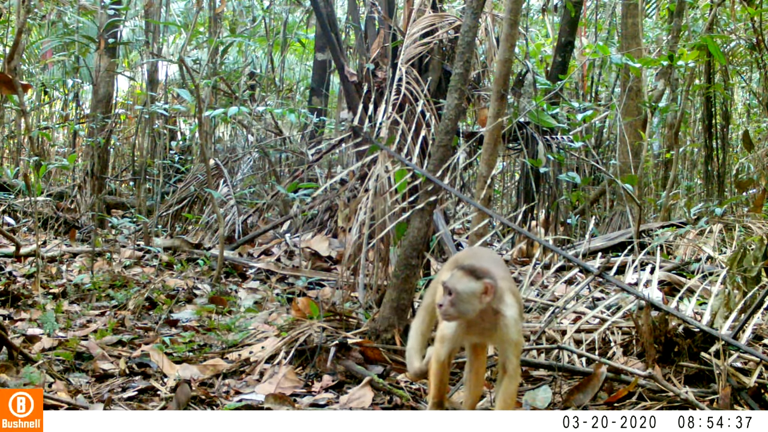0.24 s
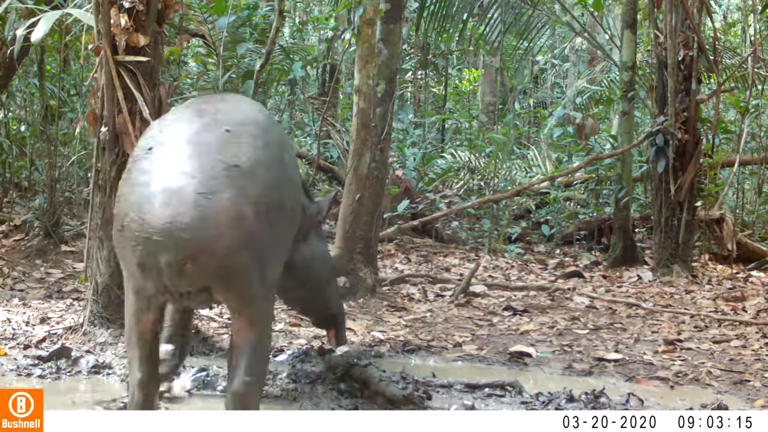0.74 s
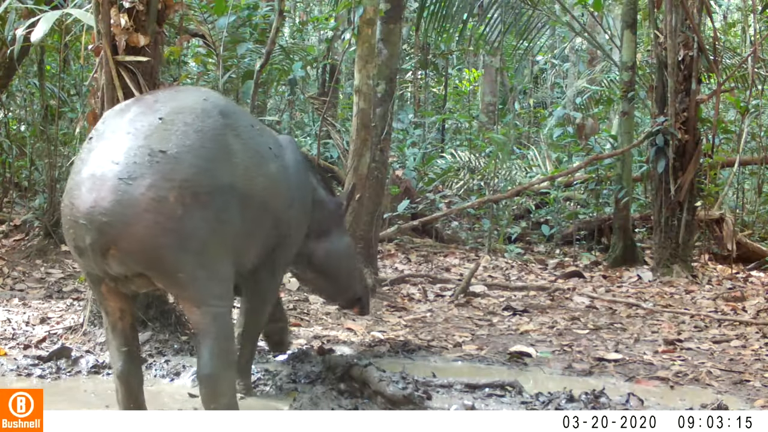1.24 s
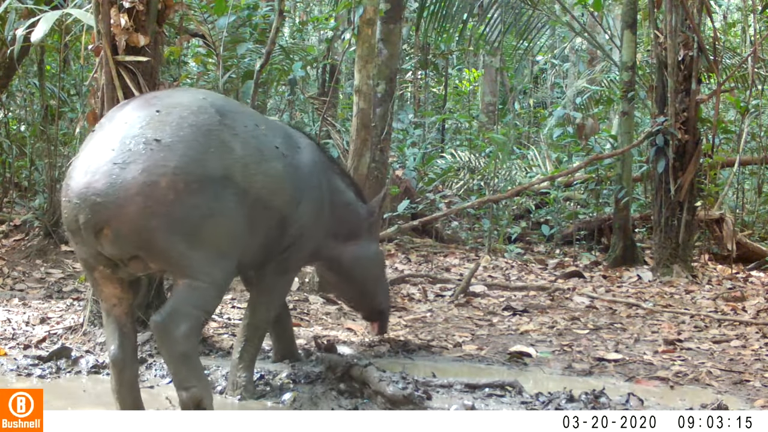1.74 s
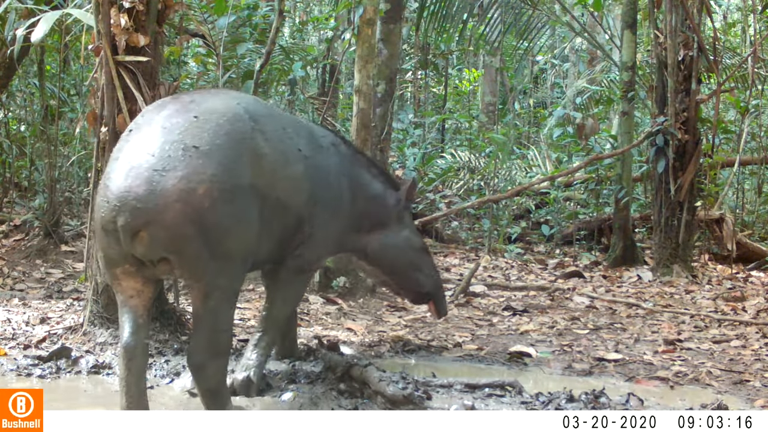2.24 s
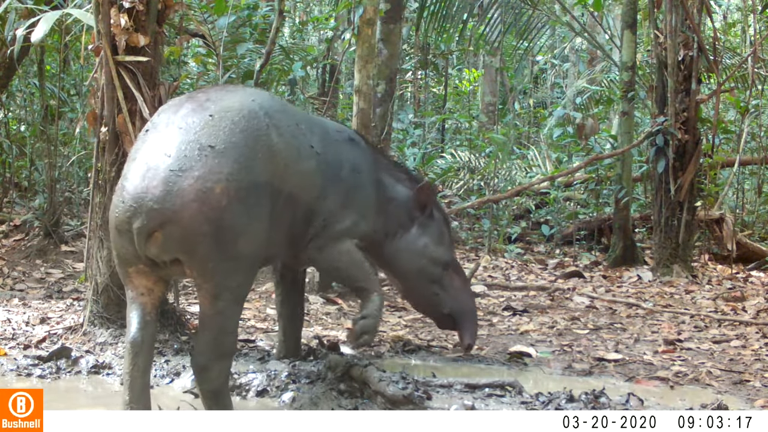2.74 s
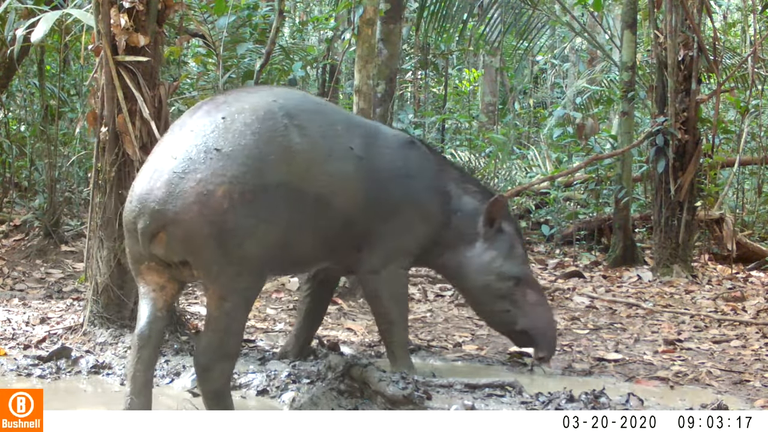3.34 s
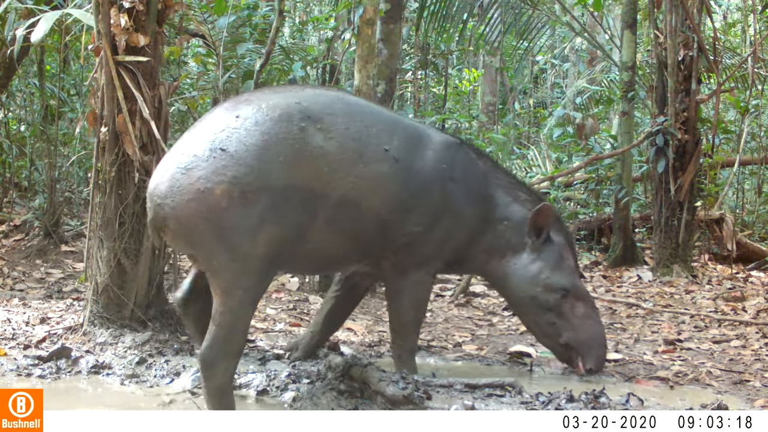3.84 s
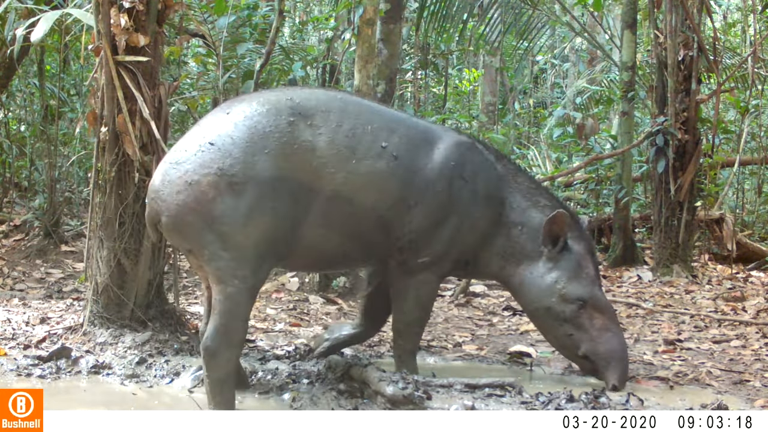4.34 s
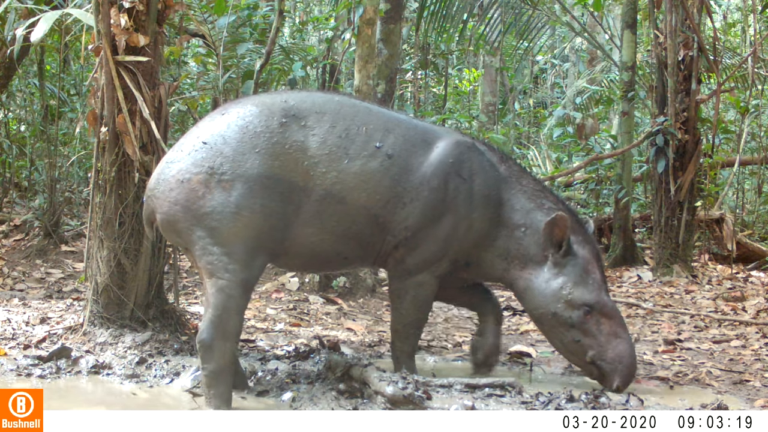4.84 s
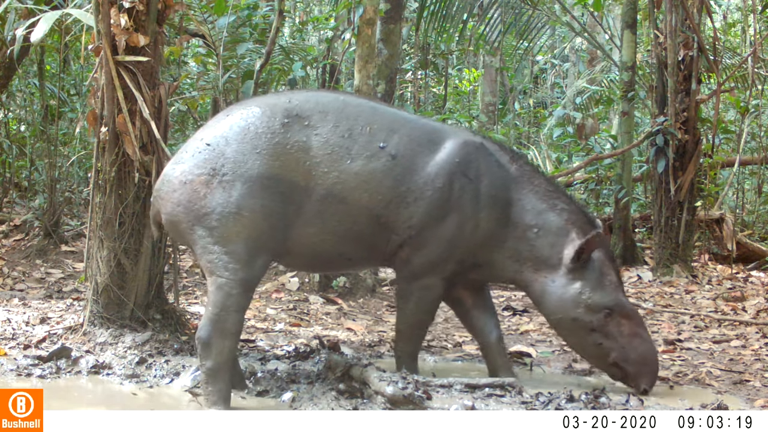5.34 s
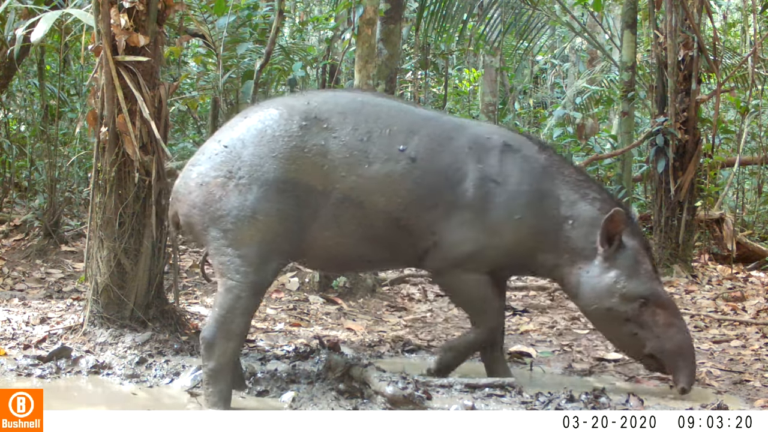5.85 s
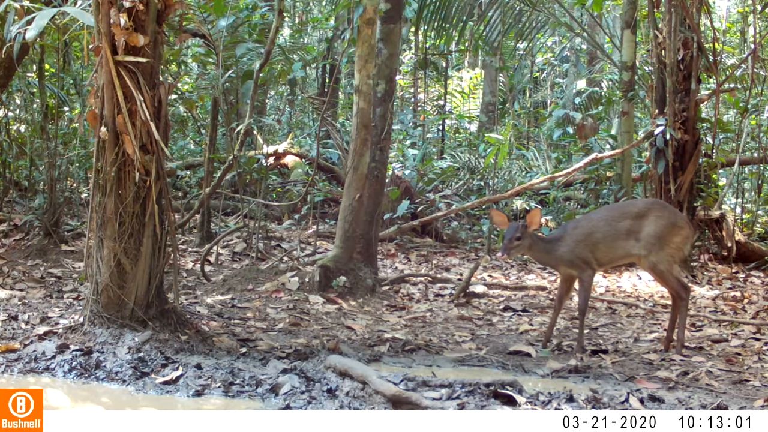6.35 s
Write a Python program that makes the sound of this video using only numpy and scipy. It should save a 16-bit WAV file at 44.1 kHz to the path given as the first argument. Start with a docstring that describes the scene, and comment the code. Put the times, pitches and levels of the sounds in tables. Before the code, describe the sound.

Muffled plops, wet smacks and small bubbles of a tapir wading through mud thin out over constant hiss and faint camera ticks.

```python
"""A tapir wades slowly through a shallow mud wallow in a forest, a few metres from a trail camera.
First comes a hiss with faint hum and static; all drops out for an instant, and hiss and hum return.
Then drops and bubbles ring, wet mud smacks and stirred slurry crackles, dulled by the camera's case.
Soon air pockets gulp as they fill and plop open under its feet, loudest around two seconds in.
From there the camera ticks faintly, in runs, while the steps thin out."""
import sys
import numpy as np
from scipy import signal
from scipy.fft import rfft, irfft
from scipy.io import wavfile
from scipy.ndimage import uniform_filter1d

SR = 44100
rng = np.random.default_rng(int(sys.argv[2]) if len(sys.argv) > 2 else 0)


def output_pcm(signal):
    """Save a mono or channel-first signal as 16-bit PCM at the path in sys.argv[1].

    Samples are clipped to [-1, 1] before scaling.
    """
    pcm = np.clip(np.atleast_2d(signal).T, -1, 1) * 32767
    wavfile.write(sys.argv[1], SR, np.round(pcm).astype(np.int16))


N = 290852
T = np.arange(N) / SR
DROPOUT_START_S, DROPOUT_END_S = .749, .798


def undb(db):
    """Decibels to gain."""
    return 10 ** (np.asarray(db) / 20)


def unit(x):
    """Scale to rms 1."""
    return x / np.sqrt(np.mean(x ** 2) + 1e-20)


def add(out, s, sound):
    """Mix a sound in at time s."""
    i = int(s * SR)
    out[i:i + len(sound)] += sound[:N - i]


def fade(t, t60):
    """Exponential decay, 60 dB down after t60."""
    return np.exp(-np.log(1000) * t / t60)


def colour(x, points):
    """EQ along a curve of (frequency [Hz], gain [dB]) points."""
    hz, db = np.transpose(points)
    f = np.maximum(np.fft.rfftfreq(len(x), 1 / SR), 1)
    return irfft(rfft(x) * undb(np.interp(np.log(f), np.log(hz), db)), len(x))


def band(x, hz, spread, order=2):
    """Broad resonance from hz / spread to hz * spread."""
    sos = signal.butter(order, [hz / spread, hz * spread], "band", fs=SR, output="sos")
    return signal.sosfilt(sos, x)


def wander(rate_hz):
    """Smooth random modulation with rms 1."""
    hold = int(SR / rate_hz)
    steps = np.repeat(rng.standard_normal(N // hold + 1), hold)
    return unit(uniform_filter1d(uniform_filter1d(steps, hold), hold)[:N])


def housing(x, low_hz=350, high_hz=4400):
    """The sealed camera case passes only the mids."""
    x = signal.sosfilt(signal.butter(1, low_hz, "high", fs=SR, output="sos"), x)
    return signal.sosfilt(signal.butter(4, high_hz, fs=SR, output="sos"), x)


# Tones of the electric hum: (frequency [Hz], relative level [dB])
HUM_TONES = [(59, -90), (125, -88)]
def hum():
    """A faint electric hum of two low sines."""
    return sum(np.sqrt(2) * undb(db) * np.sin(2 * np.pi * hz * T) for hz, db in HUM_TONES)


# EQ curve of the hiss: (frequency [Hz], relative level [dB])
HISS_EQ = [(18, -53), (30, -20.5), (55, -19.5), (88, -13.5), (123, -14), (256, -8), (299, -7.5),
           (443, -4.5), (728, -2.5), (808, -2.5), (1110, -1.5), (2550, -4.5), (3490, -12), (7080, -38),
           (15500, -40)]
# The bed before and after the dropout: (trim [dB], flicker depth [dB])
BED_STATES = [(-2.5, 1.66), (0.5, 1.0)]
def hiss_bed(level_db=-53.5, drift_db=.3, dip_db=-3.5, recover_s=.15):
    """Grainy, flickering hiss over the hum; both come back low after the dropout and swell up."""
    after = T > DROPOUT_END_S
    trim_db, flicker_db = (np.where(after, late, early) for early, late in zip(*BED_STATES))
    dip = after * np.clip(1 - ((T - DROPOUT_END_S) / recover_s) ** 2, 0, 1)
    flicker = undb(flicker_db * wander(rate_hz=500))
    flicker /= np.sqrt(uniform_filter1d(flicker ** 2, SR // 4))  # same mean power at any depth
    noise = unit(colour(rng.standard_normal(N) * flicker, HISS_EQ))
    hiss = noise * undb(level_db + drift_db * wander(rate_hz=8.5))
    return (hiss + hum()) * undb(trim_db + dip_db * dip)


def static(per_second=300, peak_db=-47, upward_share=.25):
    """Fine crackle up to the dropout: tiny electrical spikes of one size, most of one polarity."""
    chance, sign = rng.random((2, N))
    fires = (chance < per_second / SR) & (T < DROPOUT_START_S)
    spikes = fires * np.where(sign < upward_share, 1, -1)
    click = housing(signal.unit_impulse(SR // 100), low_hz=200, high_hz=2500)
    return undb(peak_db) * signal.fftconvolve(spikes, click / click.max())[:N]


def bubble(hz, t60, rise_octaves, swell_cycles=1.0):
    """A pocket of air swells within a cycle or two and rings out, bending up as it nears the surface."""
    t = np.arange(int(t60 * SR)) / SR
    envelope = (1 - np.exp(-(t * hz / swell_cycles) ** 2)) * fade(t, t60)
    glide_hz = hz * 2 ** (rise_octaves * t / t60)
    return envelope / envelope.max() * np.sin(2 * np.pi * np.cumsum(glide_hz) / SR)


def drips(level_db=-55.5, centre_hz=4300, busy_per_second=45, sparse_per_second=3):
    """Droplets and pinhead bubbles prickle as the animal shifts its weight, then thin as it walks on."""
    out = np.zeros(N)
    for start_s, end_s, rate in (.79, 3.3, busy_per_second), (3.3, 6.2, sparse_per_second):
        count = int(rate * (end_s - start_s))
        times = rng.uniform(start_s, end_s, count)
        for s, (softer_db, pitch) in zip(times, rng.standard_normal((count, 2))):
            ping = bubble(centre_hz * 2 ** (.2 * pitch), t60=.008, rise_octaves=.1)
            add(out, s, undb(level_db - softer_db) * ping)
    return out


# Foreground bubbles and drops: (time [s], pitch [Hz], relative level [dB], decay t60 [s])
BUBBLE_HITS = [ (0.837, 1520, -35, 0.026), (.852, 1260, -39, .025), (0.889, 3900, -42, .015),
               (.891, 2840, -33, .029), (.898, 3800, -45, .015), (.902, 625, -39, 0.068),
               (.908, 2980, -37, .018), (.925, 3000, -37, 0.028), (.946, 1120, -34, .014),
               (1.037, 3250, -43, .018), (1.058, 1380, -39, .018), (1.082, 3750, -46, 0.028),
               (1.112, 3180, -39.5, .022), (1.226, 2760, -37, 0.016), (1.281, 3120, -38.5, 0.019),
               (1.302, 4100, -45, .022), (1.457, 3100, -43, .018), (1.510, 1010, -38.5, 0.018),
               (1.667, 1030, -38, .023), (1.711, 3080, -40, .024), (1.759, 2600, -38.5, 0.026),
               (1.774, 1450, -39, 0.025), (1.8152, 4630, -38, .012), (1.838, 1340, -33, .02),
               (1.851, 2700, -35.5, 0.016), (1.860, 3340, -34.5, 0.017), (1.868, 1305, -31, 0.025),
               (1.8955, 4000, -43, 0.013), (1.939, 3170, -38.5, .02), (1.953, 3850, -47, 0.015),
               (2.004, 1314, -20, 0.01), (2.0042, 3200, -24, 0.012), (2.013, 2520, -35, .022),
               (2.021, 1820, -39, 0.026), (2.028, 1710, -32.5, .015), (2.0323, 3000, -30.5, 0.021),
               (2.0382, 3280, -35.5, 0.014), (2.131, 1400, -38, .028), (2.1733, 4120, -30, 0.016),
               (2.243, 2280, -39, .015), (2.2535, 1580, -33.5, .022), (2.398, 957, -27, 0.012),
               (2.7884, 1410, -35, .022), (3.028, 2970, -38, 0.031), (3.038, 1530, -35, .022),
               (3.0935, 1800, -37, .012), (3.116, 1650, -37, .014), (3.1535, 1600, -39, .016),
               (3.168, 1150, -41, .014), (3.777, 3420, -41.5, 0.014), (4.027, 2050, -39, .018),
               (4.0378, 1300, -40, .02), (4.044, 1750, -40, .018), (4.0835, 2180, -25, 0.011),
               (4.087, 1000, -40, .016), (4.092, 1750, -34, .02), (4.1055, 4700, -48, .012),
               (4.2837, 1610, -33.5, 0.023), (5.120, 3270, -39, .014), (5.133, 1450, -46, .016),
               (5.138, 2000, -40, .028), (5.146, 2930, -39, .016), (5.2155, 1130, -40.5, .018),
               (5.835, 2330, -38.5, .025), (5.853, 1720, -42, .02), (6.023, 1830, -35, .02),
               (6.223, 1040, -31.5, 0.017)]
def bubbles(gain_db=-4, hollow_db=-12, detune_octaves=.16, linger_s=.038, climb_octaves_per_s=6.6):
    """Single bubbles and drops; the mud hollow beside each rings a little off pitch, so the tail beats."""
    out = np.zeros(N)
    for s, hz, db, t60 in BUBBLE_HITS:
        offset, side = rng.random(2)
        rise = climb_octaves_per_s * max(t60 - linger_s, 0)  # only a lingering bubble surfaces
        hollow_hz = hz * 2 ** (detune_octaves * (1 + offset) * np.sign(side - .5))
        hollow = undb(hollow_db) * bubble(hollow_hz, t60, rise)
        add(out, s, undb(db + gain_db) * (bubble(hz, t60, rise) + hollow))
    return out


# Mud parting or slapping shut:
# (time [s], centre [Hz], spread to each side [ratio], relative level [dB], decay t60 [s])
SMACK_HITS = [ (0.8382, 2350, 1.15, -41.5, .012), (.908, 3670, 1.25, -39, .014),
              (.925, 2600, 1.8, -44, .012), (.9325, 330, 1.74, -37, 0.021), (.9455, 1700, 1.7, -40, .01),
              (1.091, 2620, 1.3, -41, .012), (1.094, 4700, 1.3, -43, .014), (1.112, 4500, 1.14, -49, .014),
              (1.186, 3400, 1.54, -43, .018), (1.616, 4300, 1.13, -50, .012), (1.747, 2900, 1.2, -44, .01),
              (1.752, 4800, 1.1, -49, .012), (1.8153, 2700, 1.46, -29, .009), (1.8906, 1900, 1.4, -36, .01),
              (1.9832, 1890, 1.76, -29, 0.0083), (1.990, 2300, 1.13, -28, 0.0076),
              (1.9978, 2420, 1.9, -35, 0.011), (2.004, 4140, 1.17, -22, 0.0055),
              (2.0045, 1700, 3.0, -29, .014), (2.0089, 2600, 1.4, -32, .005),
              (2.0178, 3000, 1.4, -38, .007), (2.0395, 1100, 1.4, -37, .008), (2.048, 2470, 1.1, -36, .008),
              (2.1493, 2210, 1.1, -41, 0.0051), (2.1745, 2030, 1.56, -24.5, 0.017),
              (2.3926, 1960, 1.1, -34, 0.018), (2.3958, 1370, 1.7, -35, 0.012),
              (2.3975, 1280, 1.76, -27, .012), (3.0078, 3660, 1.17, -41, 0.021),
              (3.0245, 2780, 1.1, -36.5, .008), (3.028, 4860, 1.46, -39, 0.02),
              (3.0485, 3300, 1.54, -41.5, .024), (3.1388, 1800, 2, -41, 0.0092),
              (3.723, 2210, 1.22, -40.5, .012), (3.895, 3630, 1.19, -44, .014),
              (4.071, 2500, 1.3, -37.5, .016), (4.08, 1410, 2.2, -34, 0.032),
              (4.0815, 600, 1.75, -38.5, .022), (4.091, 2300, 1.8, -41, 0.03),
              (4.106, 1800, 1.6, -39, .018), (5.115, 1500, 2.1, -43, .025), (5.1285, 2700, 1.4, -35, .014),
              (5.132, 1500, 1.6, -33, 0.02), (5.183, 3200, 1.3, -44, .02), (6.001, 2300, 1.5, -39, .01),
              (6.025, 2100, 1.5, -44, .01)]
def smacks(gain_db=-1, tear_db=-5, slap_hz=550, slap_db=-24, spray_hz=4500, spray_db=-28):
    """A mud film clicks and tears, coloured by the hollow behind it, with a low slap and bright spray."""
    out, t = np.zeros(N), T[:SR // 20]
    snap = signal.unit_impulse(len(t))
    for s, hz, spread, db, t60 in SMACK_HITS:
        envelope = fade(t, t60)
        cracks = rng.standard_normal(len(t)) * envelope
        for layer_hz, layer_db in (hz, 0), (slap_hz, slap_db), (spray_hz, spray_db):
            click = band(snap, layer_hz, spread, order=3)
            tear = unit(band(cracks, layer_hz, spread, order=3)) * np.sqrt(np.mean(envelope ** 2))
            layer = click / np.abs(click).max() + undb(tear_db) * tear
            add(out, s, undb(db + gain_db + layer_db) * layer)
    return out


# Feet and snout stirring the slurry:
# (time [s], length [s], relative level [dB], centre [Hz], pitch scatter [octaves])
STIR_CUES = [ (0.877, .065, -49, 2120, .42), (0.949, .25, -59.5, 2480, 0.34),
             (1.268, 0.29, -54.5, 2080, 0.33), (1.694, 0.12, -58, 2580, 0.29),
             (1.825, 0.064, -51.5, 1720, .4), (1.977, 0.086, -42.5, 2420, 0.28),
             (2.117, 0.087, -54, 1850, 0.31), (2.217, 0.1, -59, 2120, 0.26),
             (3.003, 0.087, -50.5, 2320, 0.27), (3.05, .135, -51, 1660, 0.317),
             (4.003, .075, -51.5, 1830, 0.24), (4.097, 0.082, -62, 1470, .35),
             (5.11, 0.052, -51.5, 2230, 0.37), (5.171, 0.046, -55, 2200, 0.34),
             (5.246, 0.075, -56, 1880, 0.13), (5.975, 0.07, -61, 2210, 0.14)]
def slurry(per_second=800, size_db=3, ring_cycles=13, wash_db=-9):
    """Each stir frees a swarm of tiny bubbles over a soft wash of water."""
    out = np.zeros(N)
    for s, length, db, hz, scatter in STIR_CUES:
        n, swarm = int(length * SR), np.zeros(N)
        for when, size, pitch in rng.random((int(per_second * length), 3)):
            octaves = scatter * np.log(pitch / (1 - pitch))
            ring_hz = np.clip(hz * 2 ** octaves, 700, 4600)
            strength = min(-np.log(1 - size), 3.5)  # small bubbles are many, large ones few
            grain = bubble(ring_hz, ring_cycles / ring_hz, rise_octaves=.15, swell_cycles=1.4)
            add(swarm, when * length, undb(size_db * strength) * grain)
        wash = unit(band(rng.standard_normal(n), hz, spread=1.7))
        swell = np.sin(np.pi * np.arange(n) / n)
        add(out, s, undb(db) * unit(unit(swarm[:n]) + undb(wash_db) * wash) * swell)
    return out


# Air pockets filling: (time [s], length [s], start pitch [Hz], end pitch [Hz], relative level [dB])
GULP_CUES = [ (1.579, 0.024, 500, 1050, -51), (1.849, 0.013, 877, 1600, -41.5),
             (2.155, 0.0091, 1310, 1550, -38), (2.788, 0.0285, 1327, 1800, -45),
             (3.137, 0.018, 1024, 1800, -47), (5.165, .008, 840, 1500, -49.5)]
def gulps(curve=2.8, attack_s=.0017, waver_db=2.5):
    """Water fills an air pocket: the note holds, wavers and sweeps up ever faster until it closes."""
    out = np.zeros(N)
    for s, length, start_hz, end_hz, db in GULP_CUES:
        t = T[:int(length * SR)]
        hz = start_hz * (end_hz / start_hz) ** ((t / length) ** curve)
        envelope = (1 - np.exp(-t / attack_s)) * np.sqrt(1 - (t / length) ** 4)
        add(out, s, undb(db) * envelope * np.sin(2 * np.pi * np.cumsum(hz) / SR))
    return out * undb(-waver_db * wander(rate_hz=250))


# Air pockets opening underfoot:
# (time [s], pitch [Hz], gap between modes [Hz], relative level [dB], decay t60 [s])
PLOP_HITS = [ (1.8156, 1560, 230, -12.5, 0.024), (1.9829, 1700, 340, -30, .012),
             (2.0026, 1660, 196, -26, 0.0087), (2.0032, 2670, 240, -22, 0.0067),
             (2.0412, 1460, 175, -31, 0.024), (2.0532, 1460, 227, -23.5, 0.026),
             (2.149, 1350, 89, -30, 0.011), (2.3951, 1197, 560, -26.5, 0.016),
             (3.018, 1660, 260, -33, .009), (3.0862, 1545, 356, -31, .013), (3.0999, 1430, 440, -30, 0.018),
             (3.1275, 1610, 100, -40, .014), (4.0794, 2300, 360, -31, 0.018),
             (5.1287, 1820, 330, -31, .011), (5.1735, 1920, 295, -34.5, .009),
             (6.0012, 2200, 400, -36, .016)]
def plops():
    """Two coupled modes of a footprint's cavity start in opposite phase, swell, and beat as they die."""
    out, t = np.zeros(N), T[:SR // 20]
    for s, hz, gap_hz, db, t60 in PLOP_HITS:
        beat = np.sin(np.pi * gap_hz * t) * fade(t, t60)
        add(out, s, undb(db) * beat / beat.max() * np.cos(2 * np.pi * hz * t))
    return out


# Runs of camera ticks: (start [s], end [s], offset within the frame [0-1], level [dB])
TICK_CUES = [(2.5, 3.65, 0.49, -51), (3.15, 4.42, 0.06, -48.5), (4.43, 4.63, 0.04, -45),
             (4.64, 5.05, .05, -49.5), (5.05, 5.846, .07, -47), (5.61, 5.97, 0.59, -45)]
def ticking(frame_hz=29.79, origin_s=2.3255, ring_hz=1195, length_s=.0053, rise_octaves=.37,
            scatter_db=1.5, pitch_jitter=.085, time_jitter_s=.00059):
    """The camera ticks in step with its frame rate, each tick a short, slightly varied rising chirp."""
    out, frames = np.zeros(N), np.arange(origin_s, T[-1], 1 / frame_hz)
    sweep = np.linspace(-.5, .5, int(length_s * SR))
    for start, end, offset, db in TICK_CUES:
        variations = rng.standard_normal((len(frames), 3))
        for s, (size, pitch, late) in zip(frames + offset / frame_hz, variations):
            if start < s < end:
                hz = ring_hz * (1 + pitch_jitter * pitch) * 2 ** (rise_octaves * sweep)
                chirp = np.cos(np.pi * sweep) * np.sin(2 * np.pi * np.cumsum(hz) / SR)
                add(out, s + time_jitter_s * late, undb(db + scatter_db * size) * chirp)
    return out


def forest(x, wet_db=-27, t60=.66, attack_s=.0036):
    """Trunks and leaves scatter a thin, short echo."""
    t = T[:SR // 2]
    reflections = band(rng.standard_normal(len(t)) ** 3, 1600, spread=2.7, order=1)
    tail = reflections * fade(t, t60) * (1 - np.exp(-t / attack_s))
    return x + undb(wet_db) * signal.fftconvolve(x, tail / np.sqrt(np.sum(tail ** 2)))[:N]


def scene():
    """Mono mix: muffled mud and water among the trees, over hiss, static and ticking."""
    wallow = plops() + bubbles() + gulps() + smacks() + slurry() + drips()
    return (housing(forest(wallow)) + hiss_bed() + static() + ticking())[None]


def record(dry):
    """A brief hard mute, then a steep high cut."""
    gate = (T < DROPOUT_START_S) | (T > DROPOUT_END_S)
    high_cut = signal.ellip(8, .2, 70, 15800, fs=SR, output="sos")
    return signal.sosfilt(high_cut, dry * gate)


dry = scene()
out = record(dry)
output_pcm(out)
```